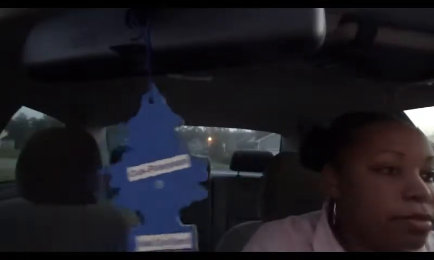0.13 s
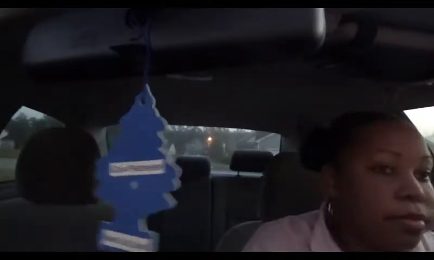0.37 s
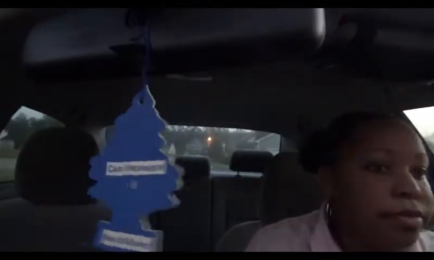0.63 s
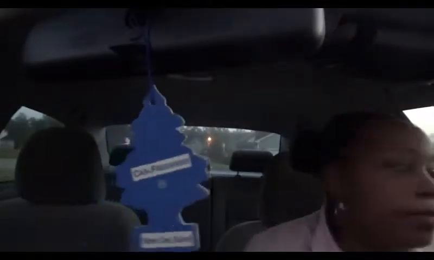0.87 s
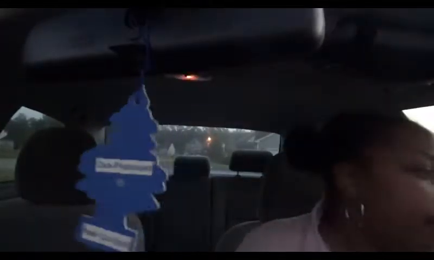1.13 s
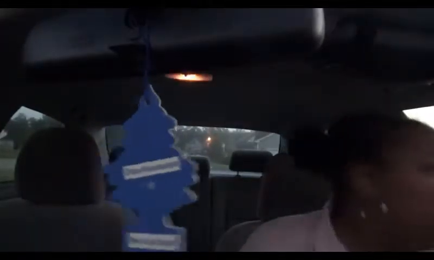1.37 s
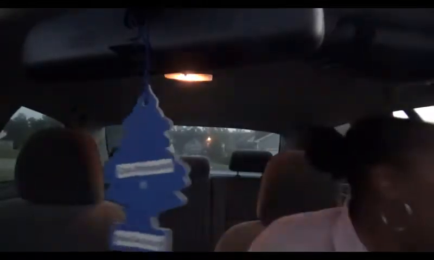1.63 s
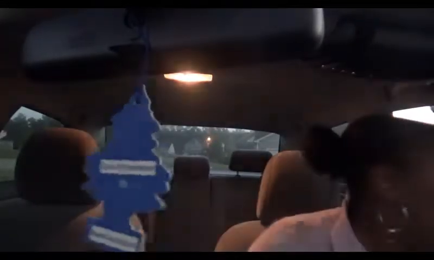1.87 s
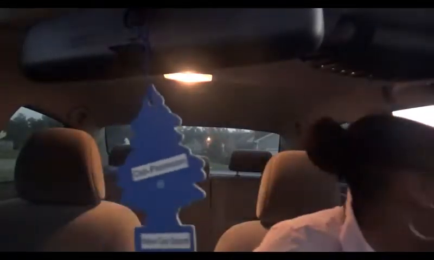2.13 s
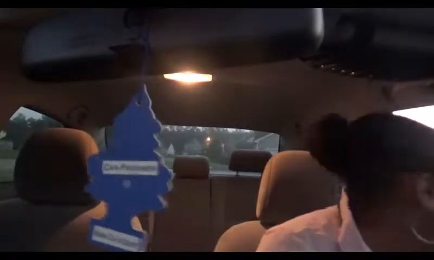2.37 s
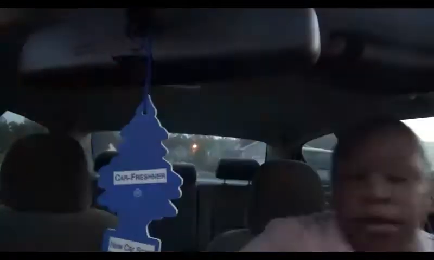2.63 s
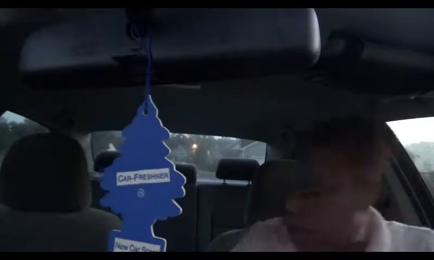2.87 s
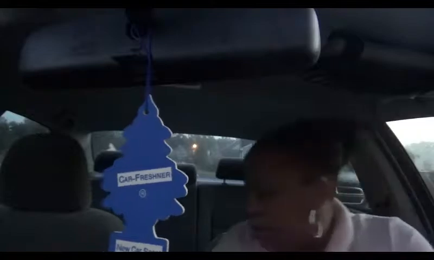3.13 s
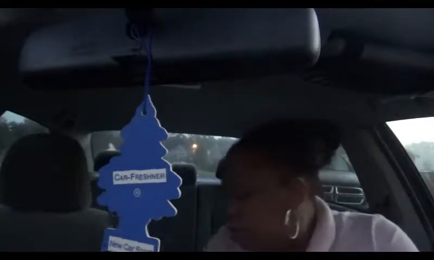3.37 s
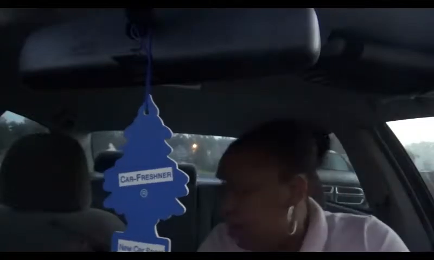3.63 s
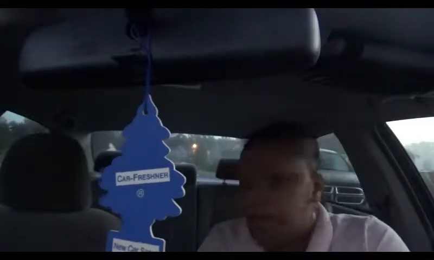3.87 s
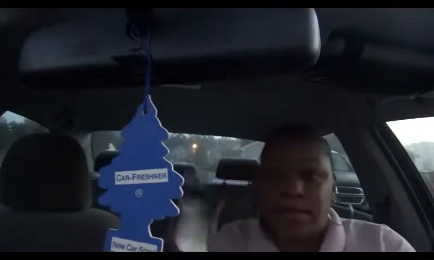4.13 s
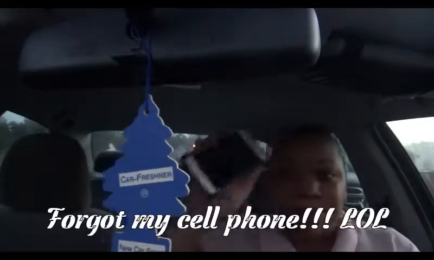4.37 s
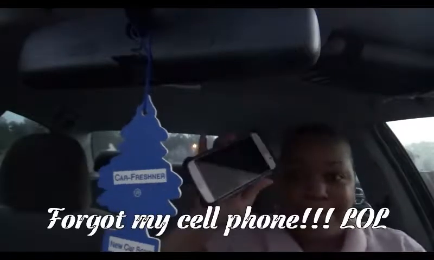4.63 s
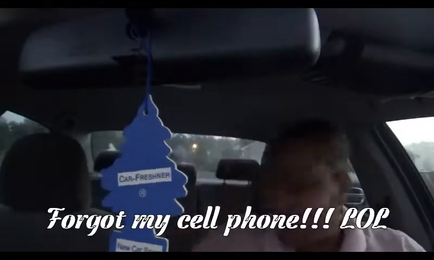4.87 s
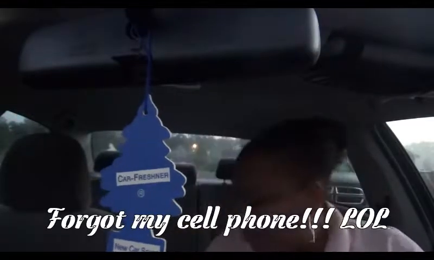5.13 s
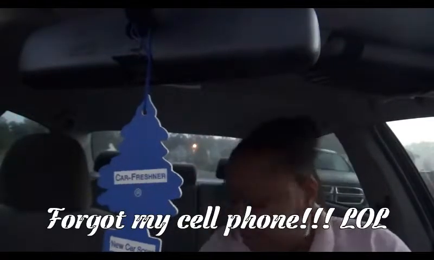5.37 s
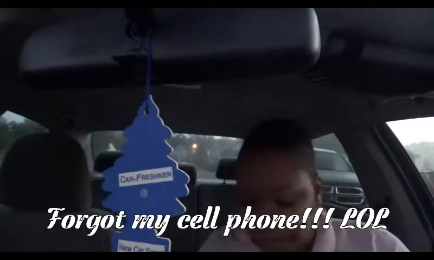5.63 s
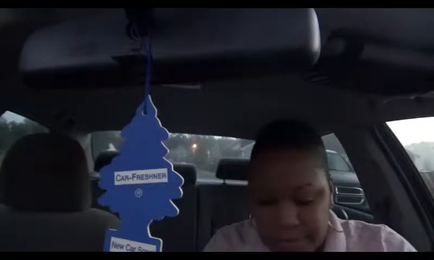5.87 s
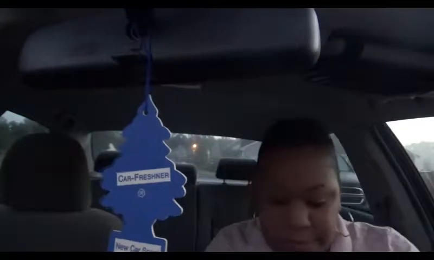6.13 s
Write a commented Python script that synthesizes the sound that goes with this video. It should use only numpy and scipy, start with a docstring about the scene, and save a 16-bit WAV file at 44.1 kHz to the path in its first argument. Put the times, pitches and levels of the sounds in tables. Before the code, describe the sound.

Heard close up in a small, dry parked car with a low, quiet background and slightly dull top. From 0 to about 0.5 s a broad rush of air, with deep rocking, dies away as the first hard clicks land. From 0.8 to 1.4 s crackly bag and clothing rustle joins clustered clicks and tiny damped key jangles. Between 1.4 and 1.9 s weight shifts bring heavy low trim thumps. A smooth cloth hiss passes near 1.95 s, then only faint ticks and soft knocks until a momentary dropout at 2.77 s. From 2.9 to 3.75 s rummaging is dense: sharp plastic clicks, rustle and a cracking knock at 3.05 s. It thins by 4.1 s, leaving near quiet. At 4.95 s clicks and rustle resume, with a key jingle at 5.25, strong thumps at 5.4 to 5.7, and rapid light clicks from 5.9 to the end.

```python
"""Handling things inside a parked car

A rush of air, shaped noise, dies away over a quiet cabin; low noise swells are the cabin and seat moving.
Hard plastic clicks are ticks with resonant noise tails, and keys and trim thumps are decaying modes.
A bag and clothes rustle as showers of crackles, and a strap or sleeve slides as an even hiss.
Near 2.77 s the level of everything dips briefly."""
import sys
import numpy as np
from scipy import signal
from scipy.fft import rfft, irfft, next_fast_len
from scipy.io import wavfile
from scipy.ndimage import uniform_filter1d

SR = 44100
rng = np.random.default_rng(int(sys.argv[2]) if len(sys.argv) > 2 else 0)


def natural_amplitude(level_db):
    """Convert a level in decibels to a linear amplitude factor, elementwise."""
    exponent = np.asarray(level_db, float) / 20
    return 10 ** exponent


def output_pcm(signal):
    """Save a mono or channel-first signal as 16-bit PCM at the path in sys.argv[1].

    Samples are clipped to [-1, 1] before scaling.
    """
    pcm = np.clip(np.atleast_2d(signal).T, -1, 1) * 32767
    wavfile.write(sys.argv[1], SR, np.round(pcm).astype(np.int16))


N = 275713  # length in samples


def curve(table):
    """Linear interpolation: a table of (s, value) becomes one value per sample."""
    s, value = np.transpose(table)
    return np.interp(np.arange(N) / SR, s, value)


def gain_at(table, size):
    """Spectral shaping: gain of a (Hz, dB) table at each FFT bin, interpolated over log frequency."""
    hz, db = np.transpose(table)
    bins = np.fft.rfftfreq(size, 1 / SR)
    return natural_amplitude(np.interp(np.log(bins + 1), np.log(hz), db))


def bump(hz, width, size):
    """Resonance: magnitude of one peak of a given width in Hz at each FFT bin."""
    bins = np.fft.rfftfreq(size, 1 / SR)
    return 1 / np.sqrt(1 + (2 * (bins - hz) / width) ** 2)


def causal(gain, size):
    """Minimum phase: folding the cepstrum gives the response that only rings after the blow."""
    cepstrum = irfft(np.log(gain + 1e-7), size)
    cepstrum[1:size // 2] *= 2
    cepstrum[size // 2 + 1:] = 0
    return np.exp(rfft(cepstrum))


def unit(x):
    """Normalisation: scales to rms 1."""
    return x / np.sqrt(np.mean(x ** 2))


def band(x, low_hz, high_hz):
    """Band-pass filtering between two frequencies."""
    sos = signal.butter(2, [low_hz, high_hz], "bandpass", fs=SR, output="sos")
    return signal.sosfilt(sos, x)


def pair(spread, size):
    """Partial coherence: left and right noise share a middle and differ by a side part."""
    mid, side = rng.standard_normal((2, size))
    return np.array([mid + spread * side, mid - spread * side])


def noise(table, spread):
    """Filtered noise: stereo noise of a given spectrum at rms 1."""
    size = next_fast_len(N)
    spectrum = rfft(pair(spread, size)) * gain_at(table, size)
    return unit(irfft(spectrum, size)[:, :N])


def flicker(rate, db):
    """Amplitude modulation: a gain gliding between random dB values, rate of them a second."""
    k = int(SR / rate)
    steps = np.repeat(rng.standard_normal(N // k + 1), k)
    return unit(natural_amplitude(db * uniform_filter1d(steps, k)[:N]))


def swells(rows, rise_db_s, fall_db_s):
    """Incoherent addition: moves rise to their start, hold and die away, and their powers add."""
    t = np.arange(N) / SR
    power = 0
    for s, held, db in rows:
        before, after = np.maximum(s - t, 0), np.maximum(t - s - held, 0)
        power = power + natural_amplitude(db - rise_db_s * before - fall_db_s * after) ** 2
    return np.sqrt(power)


def hand_swells(rows):
    """Exponential rise and decay: gain of quick hand moves."""
    return swells(rows, 512, 334)  # dB per second


def add(out, sound, s, peak_db, pan_db=0):
    """Superposition: places a stereo event by the peak of its mean and its left minus right level."""
    i = int(s * SR)
    gain = natural_amplitude(peak_db + np.array([[pan_db], [-pan_db]]) / 2)
    sound = sound[:, :N - i] * gain / np.abs(sound.mean(0)).max()
    out[:, i:i + sound.shape[1]] += sound


def ring(modes, gains, size, stretch):
    """Modal synthesis: decaying sine modes struck at once, their decay times stretched together."""
    t = np.arange(size) / SR
    total = 0
    for (hz, db, t60), gain in zip(modes, gains):
        decay = natural_amplitude(db - 60 * t / (t60 * stretch))
        total = total + gain * decay * np.sin(2 * np.pi * hz * t)
    return total


# Spectrum of the quiet cabin. Each row: frequency in Hz, relative level in dB per Hz.
QUIET_SPECTRUM = [(15, -59), (25, -64), (60, -4), (102, -3), (136, -4), (159, -4), (216, -2.5), (301, -9.5),
                  (720, -18), (819, -14), (1400, -17), (10600, -24), (11500, -37), (15000, -91),
                  (22000, -120)]


def quiet_cabin():
    """Stationary noise: a steady, mostly low background."""
    return noise(QUIET_SPECTRUM, 0.23) * natural_amplitude(-51.5)


# Spectrum of the air rush. Each row: frequency in Hz, relative level in dB per Hz.
AIR_SPECTRUM = [(35, -40), (60, -10), (132, -4), (188, -2), (319, -7.5), (416, -16), (485, -13),
                (917, -25.5), (1740, -19.5), (2690, -33), (3360, -27.5), (4470, -37), (5400, -30.5),
                (6300, -35.5), (10300, -37), (11500, -41), (15000, -77), (22000, -120)]


def air():
    """Turbulence: a broad rush of air that buffets, holds, then fades."""
    rush = noise(AIR_SPECTRUM, 0.21) * flicker(17.5, 0.82)
    rush = rush * natural_amplitude(np.array([[1.6], [-1.6]]))  # louder on the left
    rush = rush / np.std(band(rush, 1190, 2530))  # the level is that of this band
    return rush * swells([(0.0059, 0.4, -25)], 0, 110)


# The cabin rocking. Each row: start in seconds, time held in seconds, level in dB.
ROCKING = [(0, 0.27, -27.5), (.4, 0.82, -37.5), (1.43, 0.16, -27), (1.82, 0.024, -32), (1.9, 0.41, -48),
           (3.63, 0.023, -43.5), (3.74, 0.54, -54.5), (5.48, 0.041, -27.5), (5.69, 0.028, -27)]


def cabin_rocking():
    """Low-frequency motion: the whole cabin rocks on its springs, as deep swells of noise."""
    deep = unit(band(band(pair(0.1, N), 27, 137), 22, 136))
    return swells(ROCKING, 303.5, 123) * deep


def strays():
    """Random excitation: chance lesser contacts follow the level of the hand strokes at their moment."""
    per_second, over_stroke_db, spread_db, dull_db, t60 = 7, 1, 2.5, -8, 0.035
    place, size, tone = rng.random((int(per_second * N / SR), 3)).T
    stroke = hand_swells(STROKES)[(place * N).astype(int)]
    db = 20 * np.log10(stroke + 1e-9) + over_stroke_db - spread_db * np.log(size + 0.06)
    hz = 4000 + 6500 * np.sqrt(tone)
    return [(p * N / SR, d, dull_db, f, t60) for p, d, f in zip(place, db, hz)]


# Hard contacts. Each row: start in seconds, peak in dB, dull part in dB before a shared lift,
# brightest frequency in Hz, decay time (60 dB) in seconds.
CLICKS = [(0.3726, -12, -21, 5600, 0.06), (0.38, -5.5, -20, 6300, 0.065), (0.4981, -12, -5.5, 10230, 0.092),
          (0.5099, -12.5, -17, 10100, 0.073), (0.5975, -5, -10.5, 8300, 0.072),
          (0.716, -21, -0.5, 7440, 0.079), (0.768, -32.5, -2, 5000, 0.07), (0.8185, -27.5, 4, 7750, 0.051),
          (0.846, -17.5, -3, 10500, 0.15), (0.8711, -12.5, -8, 3620, 0.045),
          (0.8992, -11, -28, 9600, 0.068), (0.904, -5, -6.5, 7360, 0.08), (0.913, -4.5, -7, 9300, 0.056),
          (1.002, -23, -1.5, 6860, 0.14), (1.0739, -15, -1, 11200, 0.044), (1.1137, -15, -7, 10300, 0.072),
          (1.1294, -10, -29, 9400, 0.08), (1.1438, -9.5, -14, 8270, 0.1), (1.164, -9.5, -11, 4840, 0.066),
          (1.1813, -10.5, -8.5, 3740, 0.096), (1.257, -19.5, -33, 6400, 0.04),
          (1.312, -21, -9, 8480, 0.055), (1.335, -9.5, -5, 3900, 0.033), (1.364, -10.5, -16, 8720, 0.11),
          (1.385, -11, -25, 10500, 0.089), (1.4522, -21, -17, 10200, 0.08), (1.466, -21.5, 6, 3060, 0.13),
          (1.54, -4.5, -4.5, 2950, 0.056), (1.674, -32, 16, 1870, 0.1), (1.6995, -28.5, 20, 2100, 0.083),
          (1.7617, -17.5, -14, 3850, 0.13), (1.782, -10.5, -10, 6660, 0.07),
          (1.8593, -15.5, -21, 3730, 0.18), (2.271, -21, 2, 7240, 0.038), (2.3008, -26.5, 1, 6440, 0.099),
          (2.3324, -25.5, -8.5, 3470, 0.057), (2.4952, -26, -7, 9400, 0.14), (2.6643, -29, -25, 9600, 0.04),
          (2.7358, -26.5, 6, 4050, 0.1), (2.8737, -15, -17.5, 11000, 0.072),
          (2.899, -18.5, -20, 8000, 0.032), (2.9386, -16, -27, 5540, 0.07), (2.9606, -15.5, -16, 8100, 0.1),
          (2.9792, -7, -9, 5460, 0.073), (3.005, -9.5, -19, 10100, 0.059), (3.013, -12, -7, 10200, 0.075),
          (3.035, -15, -4, 7200, 0.043), (3.0511, -3.5, -8.5, 7300, 0.1), (3.0849, -5, -1.5, 10200, 0.084),
          (3.1265, -8, 10, 6650, 0.053), (3.1546, -16.5, -12, 10500, 0.11),
          (3.1744, -13.5, -2.5, 7400, 0.071), (3.1896, -17, -27, 10400, 0.028),
          (3.212, -21, -34, 10500, 0.029), (3.2352, -24, -25, 9000, 0.026),
          (3.2816, -14.5, -23, 9900, 0.079), (3.297, -14, -19, 9480, 0.064),
          (3.3158, -16.5, -7, 10500, 0.067), (3.3437, -14, -18, 10500, 0.045),
          (3.3663, -12, 3, 10200, 0.15), (3.3918, -3.5, -12, 11600, 0.066),
          (3.4125, -13.5, -24, 10500, 0.07), (3.434, -16, -15, 9000, 0.035),
          (3.503, -20.5, -10, 5550, 0.079), (3.5168, -10.5, -9, 6400, 0.073),
          (3.5282, -4, -11, 4050, 0.055), (3.5628, -21, -21, 4190, 0.031), (3.5756, -9, -10, 4170, 0.085),
          (3.594, 0.5, -10.5, 9860, 0.04), (3.629, -11.5, -11, 6760, 0.042),
          (3.6603, -13, -24, 10500, 0.047), (3.667, -18, -16, 5800, 0.04), (3.688, -3.5, -53, 9730, 0.054),
          (3.718, -14, -32, 8900, 0.06), (3.8804, -23, -30, 10500, 0.053), (3.9562, -13.5, -5, 5370, 0.057),
          (3.972, -14, -7, 11000, 0.034), (4.022, -16, -10, 10500, 0.055), (4.05, -23.5, -30, 6440, 0.061),
          (4.115, -32.5, -4, 9490, 0.066), (4.18, -34, -14, 4160, 0.079), (4.273, -32, -2, 10000, 0.043),
          (4.944, -30, 0.5, 9600, 0.098), (4.982, -17.5, -25, 6200, 0.086), (4.997, -21.5, -5, 5630, 0.05),
          (5.011, -26, -35, 10100, 0.04), (5.0593, -14, -10, 8300, 0.068), (5.0975, -21, -15, 6170, 0.072),
          (5.1247, -15, -23, 7940, 0.045), (5.1444, -14.5, 3, 10700, 0.1), (5.155, -11, -18, 9200, 0.052),
          (5.173, -6, -23, 9400, 0.028), (5.216, -25, -23, 10200, 0.067),
          (5.2352, -17.5, -9.5, 9230, 0.057), (5.253, -16, -44, 9500, 0.12),
          (5.3018, -16, -34, 7550, 0.054), (5.334, -22.5, -17, 6460, 0.38),
          (5.413, -16.5, -10, 3220, 0.085), (5.445, -18, -14, 6000, 0.066), (5.473, -30.5, 9, 2030, 0.05),
          (5.48, -17.5, -5, 4100, 0.056), (5.5166, -27, 3, 6000, 0.061), (5.535, -21.5, -22, 10100, 0.084),
          (5.66, -29.5, -4, 9600, 0.098), (5.684, -33, -3, 6650, 0.21), (5.788, -22.5, -24, 10200, 0.072),
          (5.801, -18.5, -17, 8450, 0.074), (5.84, -22, -30, 6000, 0.056), (5.867, -21.5, -22, 9400, 0.2),
          (5.8848, -9.5, -25, 9400, 0.086), (5.8972, -9, -19, 10500, 0.11),
          (5.919, -11.5, -22, 9700, 0.082), (5.9455, -15, -15, 7000, 0.054), (5.956, -9, -17, 7500, 0.056),
          (5.9745, -8, -4.5, 7600, 0.052), (5.9933, -18, -14, 8720, 0.11), (6.0141, -6, -22, 10000, 0.059),
          (6.026, -9, -17, 7970, 0.097), (6.052, -8, -28, 9230, 0.091), (6.066, -15.5, -10, 9000, 0.091),
          (6.0897, -9.5, -37, 9900, 0.086), (6.098, -24.5, -6, 8100, 0.12), (6.131, -23, -32, 8500, 0.11),
          (6.152, -19, -15.5, 10100, 0.076), (6.1779, -24, -11, 10200, 0.069),
          (6.202, -25, -10, 7750, 0.048), (6.2327, -10.5, -12, 5600, 0.098)]
# Resonances of hard plastic. Each row: frequency in Hz, width in Hz, relative level in dB.
PLASTIC = [(1610, 48, 2), (2300, 25, 4.5), (4160, 120, 8.5), (6000, 530, 6.5), (7600, 660, -5),
           (8720, 210, 6), (9230, 44.5, 0), (10500, 210, 14)]
# Spectrum of rubbing, also in the rustle. Each row: frequency in Hz, relative level in dB per Hz.
RUB_SPECTRUM = [(180, -19), (470, -6), (800, -12), (1400, -11), (1630, -3), (2330, -5.5), (3120, -8),
                (6000, -5.5), (10300, -5), (10900, -6), (11500, 11.5), (15000, -48.5), (22000, -120)]
# Spectrum of the first tick. Each row: frequency in Hz, relative level in dB per Hz.
TICK_SPECTRUM = [(300, -30), (1500, -12), (5000, -5), (10000, 0), (11000, -6), (12500, -50)]


def clicks(size=8192):
    """Impact: a sharp tick, then bounces and near reflections decay in the colours of hard plastic."""
    out, t = np.zeros((2, N)), np.arange(size) / SR
    plastic = sum(natural_amplitude(db) * bump(hz, width, size) for hz, width, db in PLASTIC)
    body = gain_at(RUB_SPECTRUM, size) * (1 + 0.65 * plastic)
    dull = bump(2000, 1400, size) ** 2
    crisp = causal(gain_at(TICK_SPECTRUM, size), size)
    for s, db, dull_db, hz, t60 in CLICKS + strays():
        # every piece has a few small rings of its own, and the tail comes in uneven bounces
        own = 1 + 4 * sum(bump(f, 55, size) for f in rng.uniform(1200, 11000, size=10))
        bounces = natural_amplitude(3.5 * np.repeat(rng.standard_normal(size // 32), 32))
        decay = natural_amplitude(-60 * t / t60) + 0.27 * natural_amplitude(-200 * t / t60)
        # long contacts are scrapes: they swell in and their tick is weak
        onset = 1 - np.exp(-t / (0.016 * t60))
        sharp = np.exp(-(t60 / 0.07) ** 2)
        bright_part = (1 - dull) * (0.31 + bump(hz, 470, size))
        colour = body * own * (bright_part + natural_amplitude(dull_db + 8.5) * dull)
        tail = pair(0.2, size) * bounces * decay * onset
        rings = irfft(rfft(tail) * causal(colour, size), size)
        burst = pair(0.15, size) * np.exp(-t / 0.0006)
        tick = irfft(rfft(burst) * crisp, size)
        both = rings / np.abs(rings).max() + 2.5 * sharp * tick / np.abs(tick).max()
        add(out, both[:, :size // 2], s, db)
    return out


# Weight shifting on the seat. Each row: start in seconds, time held in seconds, level in dB.
SHIFTS = [(.48, 0.075, -24.5), (.6, 1.45, -40), (.86, 0.063, -25.5), (1.19, 0.028, -25.5),
          (1.37, 0.02, -23), (1.45, 0.031, -20), (1.67, 0.031, -31.5), (1.775, 0.0085, -19.5),
          (2.0, 0.72, -44), (2.68, 0.073, -38), (3.05, 1.136, -51), (4.2, 1.7, -57), (5.42, 0.099, -38.5),
          (5.5, 0.34, -46.5), (5.9, 0.4, -53.5)]
# Spectrum of the shaken trim. Each row: frequency in Hz, relative level in dB per Hz.
SEAT_SPECTRUM = [(35, -54), (60, -7.5), (134, -1), (374, -5), (413, -8.5), (463, -8), (573, -5),
                 (911, -18.5), (1200, -17.5), (1560, -23), (2640, -120)]


def seat():
    """Structure-borne sound: weight shifting on the seat shakes the trim, as flickering low noise."""
    return swells(SHIFTS, 419, 222) * noise(SEAT_SPECTRUM, 0.21) * flicker(25, 3.5)


# Keys knocking. Each row: start in seconds, peak in dB, mode frequency in Hz nearest the blow,
# seconds until a finger or another key damps it.
JANGLES = [(.52, -17, 11100, 0.024), (1.116, -10.5, 7050, 0.012), (1.145, -18, 7400, 0.034),
           (1.367, -9, 9000, 0.022), (1.37, -29, 5860, 0.021), (1.383, -11.5, 10300, 0.041),
           (3.006, -23, 10200, 0.005), (3.414, -6.5, 10300, 0.0034), (5.013, -25.5, 10300, 0.0083),
           (5.156, -12.5, 8700, 0.0044), (5.158, -19, 9200, 0.015), (5.236, -21, 9200, 0.013),
           (5.259, -9, 9520, 0.029), (5.259, -26.5, 5740, 0.017), (5.26, -25, 8150, 0.065),
           (5.993, -18, 8350, 0.011), (5.995, -25, 10300, .02)]
# Modes of a key. Each row: frequency in Hz, level in dB, decay time in seconds before stretching.
KEY_MODES = [(4900, -6, .2), (5717, -3, .15), (7800, -4, .08), (8091, -6, .4), (8700, -2, .08),
             (9211, 0, .11), (10310, -1, .07)]


def jangles(size=8192):
    """Modal vibration: keys ring unsteadily as they swing, until a finger or another key damps them."""
    out, t = np.zeros((2, N)), np.arange(size) / SR
    for s, db, hz, hold in JANGLES:
        damp = natural_amplitude(-np.maximum(t - hold, 0) * 1600)
        steps = np.repeat(rng.standard_normal(size // 128), 128)
        swing = natural_amplitude(2.8 * uniform_filter1d(steps, 128))
        gains = [1 / (1 + ((f - hz) / 200) ** 2) + 0.03 for f, _, _ in KEY_MODES]
        # a key held or hanging differently rings a little higher or lower
        modes = [(f * (1 + 0.006 * rng.standard_normal()), g, t60) for f, g, t60 in KEY_MODES]
        keys = damp * swing * ring(modes, gains, size, 1.8)
        add(out, keys * np.ones((2, 1)), s, db)
    return out


# Hands dragging over bag and clothes. Each row: start in seconds, time held in seconds, level in dB.
STROKES = [(.82, 0.048, -24.5), (.895, 0.031, -16.5), (1.07, .33, -27.5), (1.42, 0.36, -36.5),
           (1.78, 0.012, -38), (2.87, 0.27, -27.5), (3.2, 0.44, -32), (3.5, 0.24, -36),
           (3.05, 0.091, -22.5), (3.3, 0.1, -23), (3.58, 0.056, -25.5), (3.75, 0.38, -40),
           (3.97, 0.079, -29.5), (4.98, .5, -36), (5.15, 0.031, -23), (5.26, 0.24, -45), (5.5, .27, -47),
           (5.77, 0.15, -34), (5.89, 0.19, -30), (6.1, 0.068, -35.5), (6.22, 0.059, -24)]
# Regions that crackle separately. Each row: low edge in Hz, high edge in Hz.
CREASE_BANDS = [(100, 1400), (1400, 2800), (2800, 5000), (5000, 8000), (8000, 13000)]


def crackles():
    """Random impulses: about 200 sparks a second, of widely varied strength."""
    return natural_amplitude(4.5 * rng.exponential(size=N)) * (rng.random(N) < 200 / SR)


def rustle():
    """Crackling noise: creases give showers of tiny crackles, partly shared between bands, over a hiss."""
    hiss, rub = noise(RUB_SPECTRUM, 0.22), 0
    shared = crackles()
    for low_hz, high_hz in CREASE_BANDS:
        sparks = shared + crackles()
        shower = signal.lfilter([1], [1, -np.exp(-1 / (0.003 * SR))], sparks)  # each dies in 3 ms steps
        grain = unit(unit(shower) + 0.4)
        rub = rub + band(hiss, low_hz, high_hz) * grain * flicker(25, 3)
    return hand_swells(STROKES) * rub


# Thumps and knocks on the trim. Each row: start in seconds, peak in dB, strongest frequency in Hz,
# nominal decay time in seconds, left minus right in dB.
THUMPS = [(0.865, -29, 233, 0.068, 1), (0.933, -20.5, 148, 0.26, 2), (1.163, -13.5, 2340, 0.032, 2.5),
          (3.052, -9, 2340, 0.091, 2), (3.517, -16.5, 2340, 0.036, 3), (1.173, -18.5, 208, 0.33, 2),
          (1.181, -14.5, 478, 0.1, -3), (1.211, -16.5, 183, 0.052, -1), (1.308, -24.5, 140, 0.11, -1),
          (1.314, -15.5, 444, 0.048, -4.5), (1.366, -11, 474, 0.11, -6), (1.39, -12.5, 380, 0.055, -5.5),
          (1.435, -13, 135, 0.16, -1), (1.45, -12, 360, 0.09, -9), (1.475, -5, 137, 0.084, -1.5),
          (1.539, -5.5, 473, 0.024, -3), (1.541, -11, 175, 0.084, -4), (1.558, -11.5, 83, 0.12, -2),
          (1.753, -16, 475, 0.22, -9), (1.768, -11.5, 247, 0.62, -6), (1.783, -3.5, 411, 0.12, -7.5),
          (1.828, -8.5, 150, 0.13, -2.5), (1.998, -16.5, 140.6, 0.14, -1),
          (2.2715, -29.5, 1170, 0.049, -1.5), (2.275, -24.5, 220, 0.17, -2), (2.303, -36, 1170, 0.03, -1.5),
          (2.321, -31, 200, 0.12, -1), (2.333, -37, 1150, 0.043, 0), (2.66, -21.5, 93, 0.13, -2.5),
          (3.084, -14, 610, 0.049, 0.5), (3.369, -16, 693, 0.059, 2), (3.595, -25, 406, 0.038, 0),
          (3.626, -24.5, 400, .05, 0), (3.635, -23, 126, 0.079, 3), (5.396, 0, 257, 0.12, -1.5),
          (5.472, -9, 440, 0.063, 2), (5.477, -2.5, 135, 0.12, 3), (5.516, -13, 186, 0.085, 4),
          (5.682, -10.5, 244, 0.1, 4.5), (5.734, -21.5, 219, 0.059, 5)]
# Modes of the trim. Each row: frequency in Hz, level in dB before compression to about half,
# decay time in seconds before each thump scales it.
TRIM_MODES = [(44.7, -32, 0.17), (86.3, -6, 0.17), (138.1, -1.5, 0.12), (191.4, 12.5, 0.11),
              (239.6, 2.5, 0.11), (290.5, 7.5, 0.081), (376, -9.5, 0.15), (475, -4.5, 0.068),
              (627, -1, 0.11), (821, 4, 0.048), (1170, 5, 0.13), (2340, 17, 0.069)]


def thumps(size=16384):
    """Modal excitation: a soft push rings modes near the spot; padding scuffs and the panel cracks."""
    out, t = np.zeros((2, N)), np.arange(size) / SR
    for s, db, hz, t60, pan_db in THUMPS:
        gains = []
        for k, (f, g, _) in enumerate(TRIM_MODES):
            nearness = 1 / (1 + (np.log(f / hz) / 0.21) ** 2) ** 1.06
            gains.append(-(-1) ** k * nearness / natural_amplitude(0.49 * g))  # neighbours in opposite phase
        low_hz, high_hz = 0.77 * hz, 1.8 * hz
        padding = unit(band(band(pair(0.29, size), low_hz, high_hz), low_hz, high_hz))
        scuff = 0.12 * padding * natural_amplitude(-60 * t / (1.06 * t60))
        crack = 0.086 * unit(band(pair(0.33, size), 600, 2600)) * natural_amplitude(-60 * t / 0.055)
        # every thump detunes the modes slightly
        spot = [(f * (1 + 0.024 * rng.standard_normal()), g, d) for f, g, d in TRIM_MODES]
        onset = 1 - np.exp(-t / min(0.004, 3.3 / hz))
        body = (crack + ring(spot, gains, size, t60 / 0.13) + scuff) * onset
        add(out, body, s, db, pan_db)
    return out


# A smooth strap or sleeve sliding. Each row: start in seconds, time held in seconds, level in dB.
SLIDES = [(1.87, 0.11, -48), (1.984, 0.13, -35.5), (1.95, 0.015, -19.5), (2.3, 0.56, -54),
          (2.73, 0.0081, -36.5)]
# Spectrum of the slide. Each row: frequency in Hz, relative level in dB per Hz.
SLIDE_SPECTRUM = [(500, -12), (1500, -6.5), (2600, -1), (6500, -2), (11000, -1), (11600, -40)]


def slide():
    """Sliding friction: smooth cloth drawn along gives an even hiss without crackle."""
    return hand_swells(SLIDES) * noise(SLIDE_SPECTRUM, 0.22) * flicker(30, 1.2)


def brief_dip():
    """Gain envelope: a quick fall of 25 dB, a short hold and a return."""
    start, held = 2.768, 0.016  # s
    end = start + held
    return natural_amplitude(curve([(start - 0.005, 0), (start, -25), (end, -25), (end + 0.006, 0)]))


# Where the handling is. Each row: time in seconds, left minus right in dB.
SIDE_DB = [(0.0, -5), (0.77, -2), (1.43, 0.0), (1.53, -2), (1.81, -2.5), (3.1, -1.5), (3.43, 0.5),
           (6.25, -0.5)]


def hands():
    """Level panning: all the handling sounds move together between left and right."""
    handling = rustle() + slide() + clicks() + jangles()
    return handling * natural_amplitude(curve(SIDE_DB) * np.array([[0.5], [-0.5]]))


def scene():
    """Superposition: all sources over the quiet cabin, with the brief dip in level."""
    mix = quiet_cabin() + air() + cabin_rocking() + seat() + thumps() + hands()
    return mix * brief_dip()


def top_cut(x):
    """Nothing passes above the cut-off."""
    return signal.sosfilt(signal.butter(12, 12110, fs=SR, output="sos"), x)


def record(dry):
    """Low-pass filtering and saturation: the top is cut steeply at 11 kHz, then loud peaks are rounded."""
    top = signal.ellip(9, 0.3, 51, 11000, fs=SR, output="sos")
    mix = np.tanh(0.5 * signal.sosfilt(top, dry)) / 0.59
    return top_cut(mix)


dry = scene()
out = record(dry)
output_pcm(out)
```